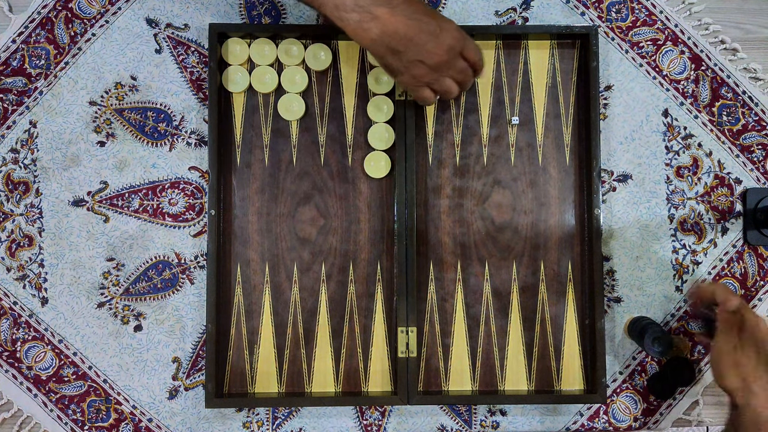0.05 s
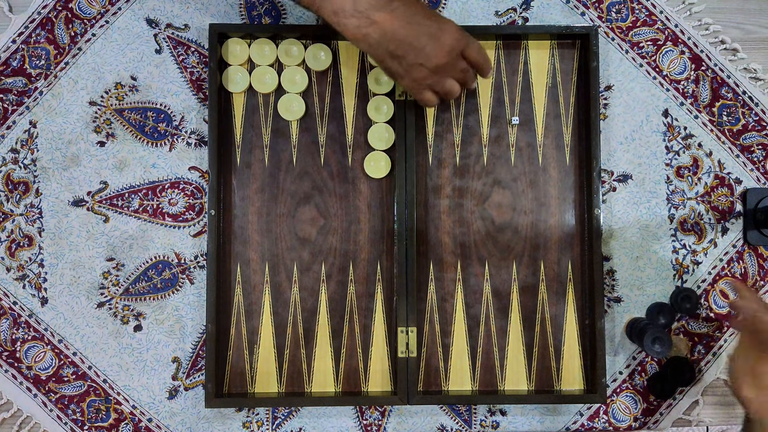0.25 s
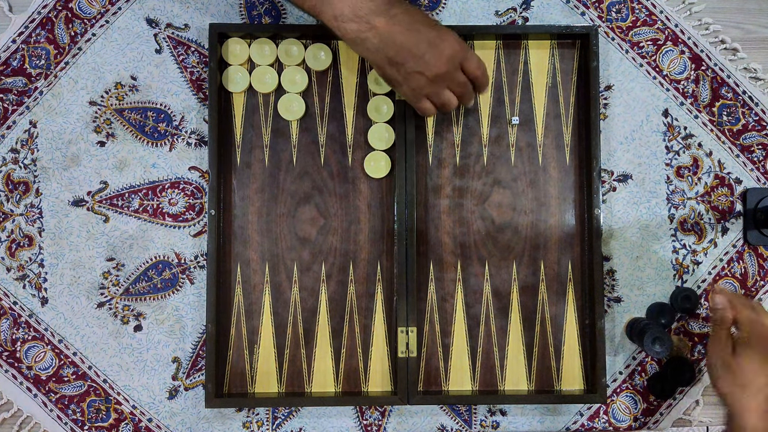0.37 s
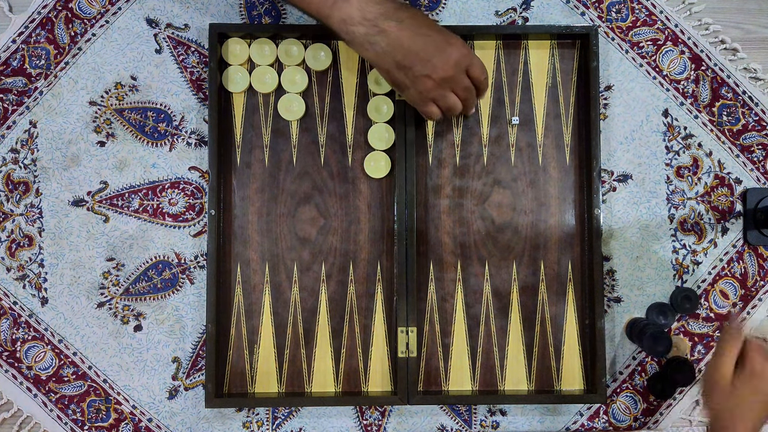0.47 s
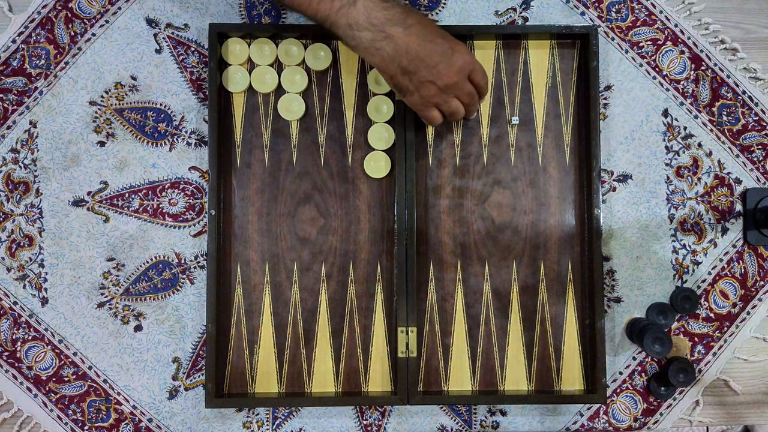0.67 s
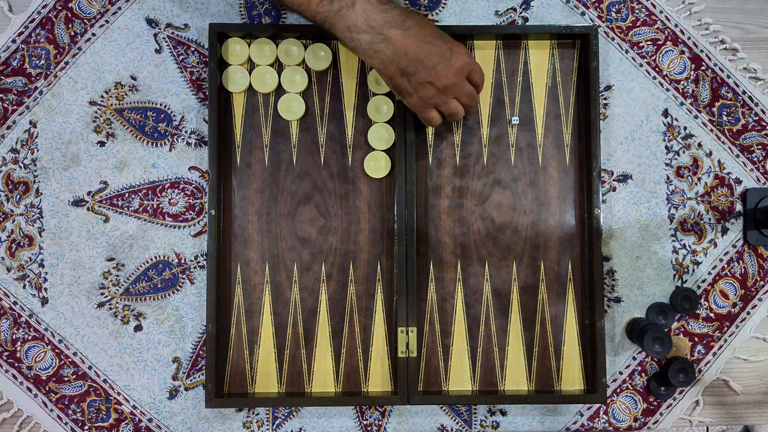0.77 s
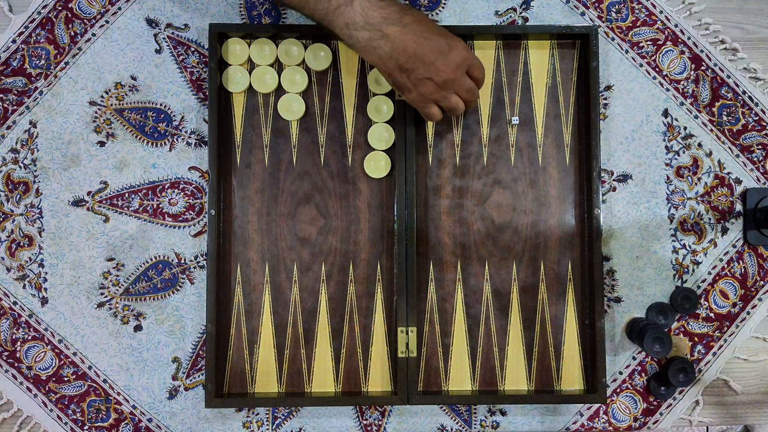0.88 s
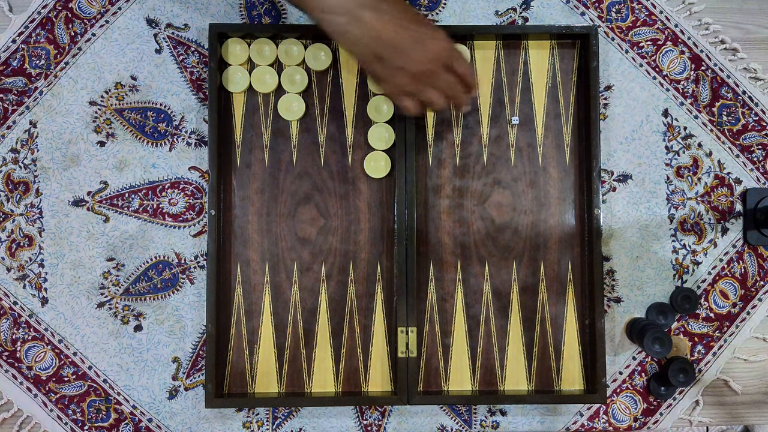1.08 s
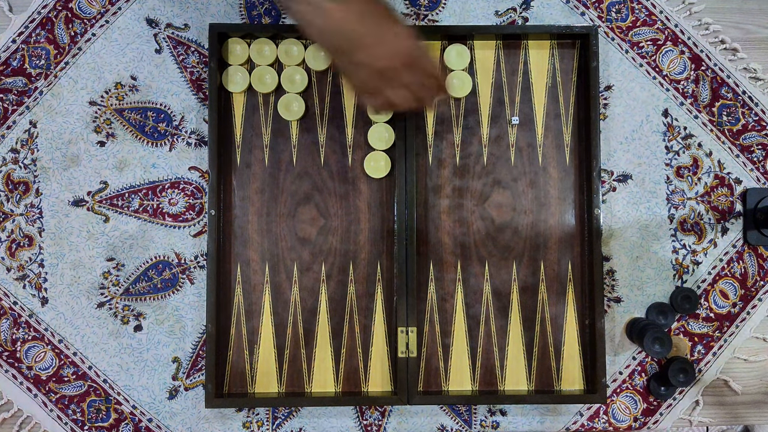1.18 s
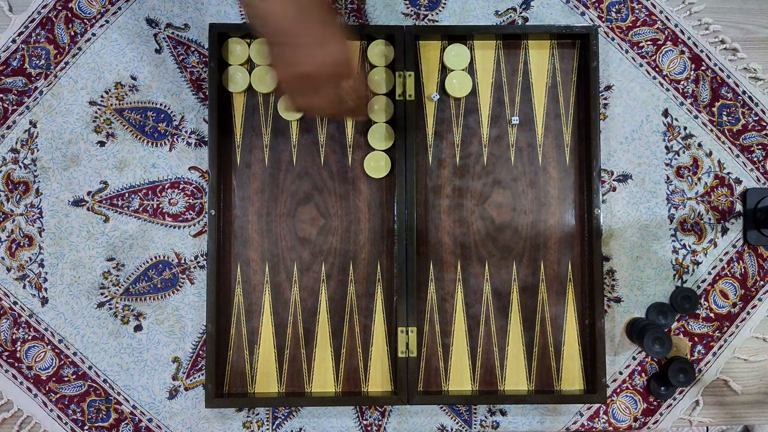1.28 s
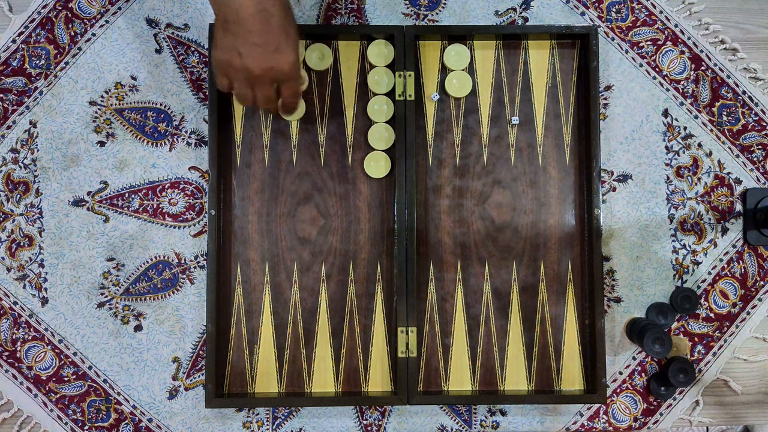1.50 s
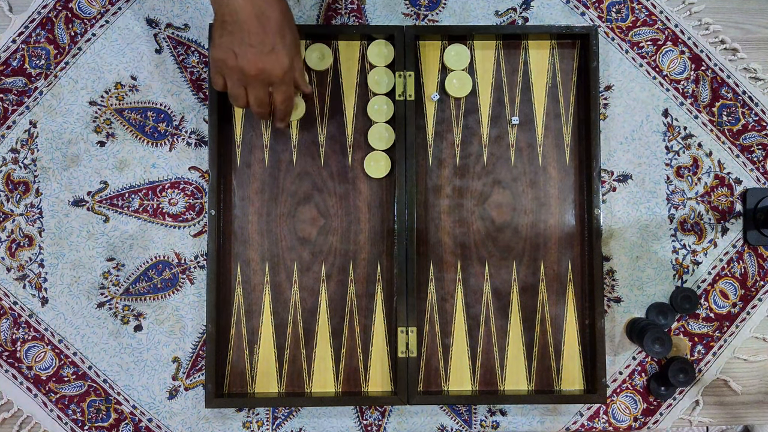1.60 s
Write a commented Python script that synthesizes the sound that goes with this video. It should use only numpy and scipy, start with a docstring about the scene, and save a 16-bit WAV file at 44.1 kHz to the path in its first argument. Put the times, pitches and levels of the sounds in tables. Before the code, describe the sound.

Backgammon checkers clack down twice on hollow wood, followed by faint brushing and a soft bump.

```python
"""Checkers knock on a hollow wooden backgammon board: the first lands flat and makes it boom,
the second clacks down against the first and rattles to rest. Hard rim contacts give the snap and
set the panel and checkers ringing; blunt pushes sound the board's low modes.
A hand then brushes across the board and bumps it softly. Behind it all is a quiet room,
with deep bass swells after the knocks, a short tail and a faint hiss."""
import sys
import numpy as np
from scipy import signal
from scipy.fft import rfft, irfft
from scipy.io import wavfile

SR = 44100
rng = np.random.default_rng(int(sys.argv[2]) if len(sys.argv) > 2 else 0)


def materialize(psi):
    """Save the field psi as 16-bit PCM at rate SR to the path in sys.argv[1].

    A 1-D psi becomes a single channel; in a 2-D psi each row is a channel.
    """
    bounded = np.clip(np.atleast_2d(psi).T, -1, 1)
    quanta = np.round(bounded * 32767).astype(np.int16)
    wavfile.write(sys.argv[1], SR, quanta)


N = 72765

# hard rim hits: t/s, level/dB, low cut/Hz, high cut/Hz, ring send/dB
RIM_HITS = [(0.2148, -25, 450, 7600, -4.5), (0.225, -24.5, 700, 6540, -3), (.2285, -30.5, 700, 5500, -5),
            (0.2379, -16.5, 400, 12000, -7.5), (0.2468, -18, 200, 11500, -1),
            (.2497, -10.5, 200, 1690, -3.5), (.2570, -20, 300, 11500, 0), (.2690, -24, 500, 6000, -4),
            (.2790, -32, 700, 6040, -3.5), (.2885, -26.5, 900, 7000, -9), (.3100, -28, 1800, 4500, -15.5),
            (0.3119, -27.5, 1110, 6500, -20), (0.3542, -55, 1800, 6000, -10),
            (0.6084, -40.5, 1050, 1700, -5), (0.6137, -32.5, 1100, 1650, -3),
            (0.6569, -16.5, 300, 6500, -19), (0.6736, -15.5, 300, 11400, -2.5),
            (.6779, -13.5, 300, 12000, -1.5), (.6808, -26, 400, 6460, 2.5), (.7215, -33.5, 593, 5000, 1),
            (.7690, -39, 500, 5550, 3), (.7730, -32, 500, 1790, -1), (0.7977, -29, 500, 7200, -10),
            (0.8152, -40, 700, 3050, -5), (1.0180, -34.5, 953, 1570, -6), (1.1014, -49.5, 703, 1805, -1)]
# EQ of the snap: f/Hz, level/dB
SNAP_EQ = [(60, -27), (400, -8.5), (570, -12), (740, -0.5), (1220, 3.5), (1900, -9), (2800, -9),
           (4800, -8.5), (6500, -20), (11000, -25.5), (12500, -29.5), (14000, -32.5), (15500, -54.5)]
# modes of the playing panel: f/Hz, level/dB, t60/s
PANEL_MODES = [(705, -31, 0.09), (760, -22.5, 0.17), (1000, -26, .14), (1098, -31.5, .14),
               (1182, -23, 0.17), (1305, -29, .1), (1480, -26.5, .14), (1590, -31, .1), (1760, -32.5, 0.19),
               (2259.7, -39, .09), (2495, -35.5, 0.14), (3003, -36.5, 0.18), (3480, -37.5, .1),
               (4670, -36, 0.079), (5708, -37.5, 0.14)]
def rim_clicks():
    """Each rim hit snaps, scatters in the frame and rings the panel and the wood's dense high modes."""
    scatter_db, grain_db, panel_db = 2.5, -7, -3
    out, t = np.zeros(N), seconds(.5)
    pulse, panel = snap(SNAP_EQ), ring(PANEL_MODES, t)
    for s, db, low_cut, high_cut, ring_db in RIM_HITS:
        scatter = amp(scatter_db) * burst(t, t60=.017)
        grain = amp(grain_db + ring_db) * burst(t, t60=.28)
        paths = scatter + grain
        paths[0] += 1  # the direct snap
        click = signal.fftconvolve(paths, pulse)[:len(t)] + amp(ring_db + panel_db) * panel
        add(out, s, amp(db) * soften(thin(click, low_cut), high_cut))
    return out


# the checkers' own modes: t/s, f/Hz, level/dB, t60/s
TINGS = [(.2472, 7350, -34.5, .02), (0.2466, 11330, -37.5, 0.0093), (.2570, 7400, -33, 0.034),
         (.2570, 11300, -42, 0.017), (0.6736, 10680, -39, 0.022), (0.678, 10660, -37, 0.018),
         (.6779, 6800, -39, 0.022)]
def checker_tings():
    """Struck checkers ring high and short, with a halo of nearby reflections."""
    out, t = np.zeros(N), seconds(.5)
    for s, hz, db, t60 in TINGS:
        ting = ring([(hz, db, t60)], t)
        reflections = signal.fftconvolve(ting, burst(t, t60=.09))[:len(t)]
        add(out, s, ting + amp(-10) * reflections)
    return out


# blunt hits on the board: t/s, level/dB, contact time/s
BLUNT_HITS = [(.2186, -19.5, 0.0027), (.2431, -12.5, 0.00053), (.2487, -8.5, 0.00048), (.2508, -6.5, .0009),
              (.2552, 3.5, 0.0022), (.2604, -9, 0.0014), (.3102, -22.5, 0.0024), (.3630, -36, 0.0011),
              (0.616, -18, 0.0075), (.6320, -16, 0.0094), (0.66, -25, 0.0012), (.6780, -25, 0.0052),
              (1.535, -47, 0.00061), (1.548, -40, 0.0019), (1.558, -28.5, 0.0033), (1.582, -21, 0.0065)]
def blunt_pushes():
    """The force of a checker's face or a finger on the board: the longer the contact, the duller."""
    force, t = np.zeros(N), seconds(.87)
    for s, db, contact in BLUNT_HITS:
        push = t * np.exp(-4 * t / contact)
        add(force, s, amp(db) * push / push.sum())
    return force


# low modes of the hollow board: f/Hz, level/dB, t60/s
BOARD_MODES = [(127, -24.5, 0.138), (172.3, -19.5, 0.093), (198, -7, 0.091), (286, -20.5, 0.11),
               (368.6, -14, 0.115), (423.3, -22.5, 0.12), (508.4, -5, 0.051), (674.2, -1.5, 0.077),
               (770, -8.5, 0.051), (860, -17, 0.045), (1104, -17.5, 0.075), (1386, -22, 0.096),
               (1530, -26.5, 0.072)]
def board_boom(force):
    """The hollow board booms under each push but radiates little deep bass."""
    body = thin(ring(BOARD_MODES, seconds(.87)), edge_hz=150, order=3)
    return signal.fftconvolve(force, body)[:N]


# brush strokes: t/s, length/s, level/dB, high cut/Hz
STROKES = [(.595, 0.065, -60, 1107), (.655, 0.12, -50, 483), (.74, 0.16, -59, 450), (0.947, 0.12, -63, 560),
           (1.03, 0.14, -59.5, 1320), (1.303, 0.076, -57.5, 900), (1.45, .10, -58, 705),
           (1.533, 0.12, -43.5, 525)]
# EQ of the friction: f/Hz, level/dB
FRICTION_EQ = [(30, -5), (100, -3), (200, 4), (290, -1), (430, -1), (700, -8), (1300, -7), (2200, -16),
               (8000, -1)]
def brushing():
    """Soft friction swells and fades as hand and checkers slide over the board."""
    out = np.zeros(N)
    for s, length, db, high_cut in STROKES:
        t = seconds(length)
        friction = soften(noise(FRICTION_EQ), high_cut, order=2)
        swell = np.sin(np.pi * (t / length) ** .66)  # peaks early
        add(out, s, amp(db) * swell * friction[:len(t)] / friction.std())
    return out


# low swells after the hits: t/s, length/s, level/dB, f/Hz
BASS_SWELLS = [(0.265, 0.1, -42.5, 69), (0.361, 0.16, -55.5, 77), (0.611, 0.14, -55, 71.2),
               (1.549, 0.1, -44, 72.5)]
def bass_swells():
    """Short, deep bass swells hum in the room after the knocks."""
    out = np.zeros(N)
    for s, length, db, hz in BASS_SWELLS:
        t = seconds(length)
        swell = np.sin(np.pi * t / length)
        add(out, s, amp(db) * swell * np.sin(2 * np.pi * hz * t))
    return out


ROOM_DELAY_S = .012
# low modes of the room: f/Hz, level/dB, t60/s
ROOM_MODES = [(65, -47.5, .65), (79.95, -42.5, .7), (116.5, -40, 0.73), (156, -46, 0.36), (222, -47.5, .33),
              (365.7, -41, 0.74), (420, -47.5, .6), (455, -51.5, 0.51)]
def standing_waves(force):
    """Pushes on the board set the room's standing waves humming."""
    out = np.zeros(N)
    add(out, ROOM_DELAY_S, signal.fftconvolve(force, ring(ROOM_MODES, seconds(.87))))
    return out


# reverb decay curve, notched by two near-zero points: f/Hz, t60/s
TAIL_DECAY = [(70, .55), (200, 0.5), (420, .5), (650, -0.04), (900, 0.28), (3000, 0.01), (12000, 0.37)]
# reverb send: f/Hz, level/dB
TAIL_SEND = [(70, -18), (200, -21), (450, -21.5), (900, -26.5), (3000, -20.5), (12000, -20.5)]
def room_tail(x):
    """The room answers with a diffuse tail in which the bass lingers longest."""
    hz, t, bands = signal.stft(rng.standard_normal(SR), SR, nperseg=512)
    t60 = read(TAIL_DECAY, hz)[:, None]
    decay = amp(read(TAIL_SEND, hz)[:, None] - 60 * t / t60)
    energy_trim = np.sqrt(2 * np.log(1000) / (t60 * SR))  # longer tails start lower
    response = signal.istft(bands * decay * energy_trim, SR, nperseg=512)[1]
    out = np.zeros(N)
    add(out, ROOM_DELAY_S, signal.fftconvolve(x, response))
    return out


# EQ of the room tone: f/Hz, level/dB
HISS_EQ = [(25, 3), (70, -4.5), (200, -2), (320, -3), (430, 2), (600, -4.5), (1000, -9), (2200, -16),
           (5000, -19), (10000, -25), (14000, -22.5), (14800, -32.5)]
# its fader ride: t/s, level/dB
HISS_FADER = [(0, -73), (.05, -74.5), (.07, -128), (0.114, -104.5), (.13, -77), (.19, -68.5), (.35, -66.5),
              (.55, -67), (.9, -66.5), (1.1, -62.5), (1.22, -68.5), (1.33, -66.5), (1.41, -68), (1.56, -62),
              (1.65, -61)]
# stretch of deeper flicker: from t/s, to t/s, extra depth/dB
DEEP_FLICKER = (1.15, 1.45, 2.9)
def room_hiss():
    """Faint, flickering room tone that drops away briefly before the first knock."""
    step_s, flicker_db = .008, 1.56
    start, end, extra_db = DEEP_FLICKER
    t = np.arange(N) / SR
    steps = np.clip(rng.standard_normal(1000), -3, 1.3)
    flicker = np.interp(t / step_s, np.arange(1000), steps)
    depth_db = flicker_db + extra_db * ((t > start) & (t < end))
    fader_db = np.interp(t, *np.transpose(HISS_FADER))
    return noise(HISS_EQ) * amp(fader_db + depth_db * flicker)


def amp(db):
    """Decibels to gain."""
    return 10 ** (np.asarray(db) / 20)


def read(points, hz):
    """A curve's value on a log-frequency axis."""
    f, value = np.transpose(points)
    return np.interp(np.log(hz + 1), np.log(f + 1), value)


def add(mix, s, sound):
    """Mixes a sound in at time s."""
    part = mix[max(round(s * SR), 0):][:len(sound)]
    part += sound[:len(part)]


def seconds(length):
    """A time axis."""
    return np.arange(int(length * SR)) / SR


def soften(x, edge_hz, order=5):
    """High cut."""
    return signal.lfilter(*signal.butter(order, edge_hz, fs=SR), x)


def thin(x, edge_hz, order=2):
    """Low cut."""
    return signal.lfilter(*signal.butter(order, edge_hz, "high", fs=SR), x)


def noise(eq):
    """Coloured noise of rms 1."""
    gain = amp(read(eq, np.fft.rfftfreq(N, 1 / SR)))
    x = irfft(rfft(rng.standard_normal(N)) * gain, N)
    return x / x.std()


def snap(eq, size=2048):
    """The sharpest causal pulse with this spectrum, peak 1."""
    log_gain = np.log(amp(read(eq, abs(np.fft.fftfreq(size, 1 / SR)))))
    minimum_phase = np.exp(np.conj(signal.hilbert(log_gain)))
    x = np.fft.ifft(minimum_phase).real
    return x / abs(x).max()


def ring(modes, t):
    """Decaying modes set off at t = 0."""
    return sum(amp(db - 60 * t / t60) * np.cos(2 * np.pi * hz * t) for hz, db, t60 in modes)


def burst(t, t60):
    """Dying noise of energy 1."""
    x = rng.standard_normal(len(t)) * amp(-60 * t / t60)
    return x / np.linalg.norm(x)


def scene():
    """Checkers, board, hand and room in one mono mix."""
    force = blunt_pushes()
    checkers = rim_clicks() + checker_tings()
    low_end = board_boom(force) + bass_swells() + standing_waves(force)
    bus = checkers + low_end + brushing()
    return (bus + room_tail(bus) + room_hiss())[None]


def record(dry):
    """The recorder thins the deepest bass, rounds the tallest peak and limits the band."""
    ceiling, high_cut_hz = .53, 15650
    x = thin(dry, edge_hz=14, order=1)
    x = x / (1 + (x / ceiling) ** 8) ** (1 / 8)  # soft clip
    high_cut = signal.firwin(511, high_cut_hz, window=("kaiser", 9), fs=SR)
    return signal.oaconvolve(x, high_cut[None], "same")


dry = scene()
out = record(dry)
materialize(out)
```